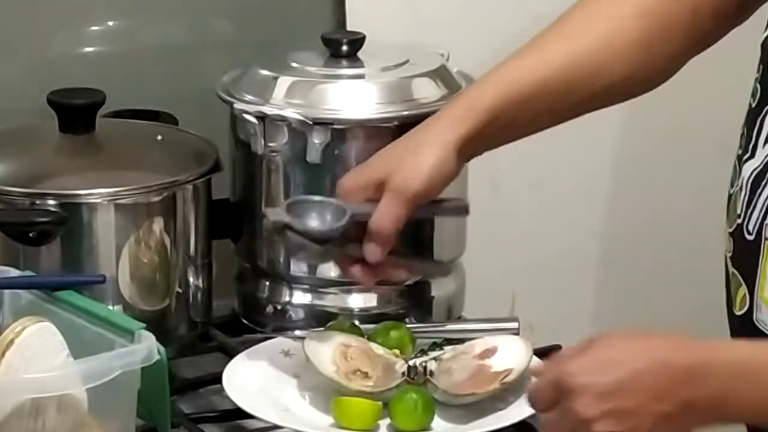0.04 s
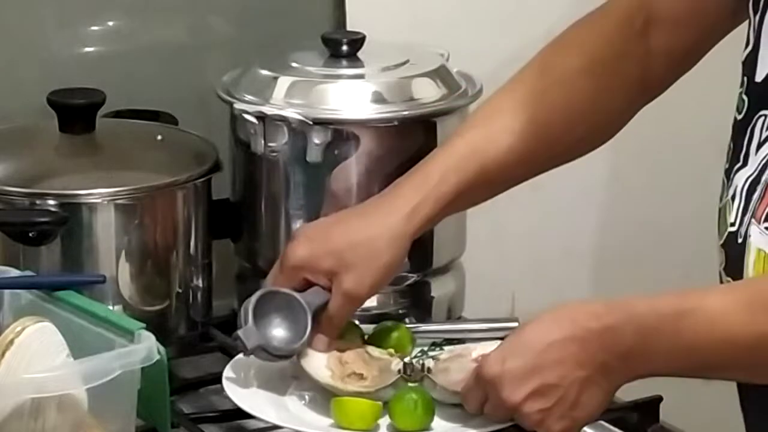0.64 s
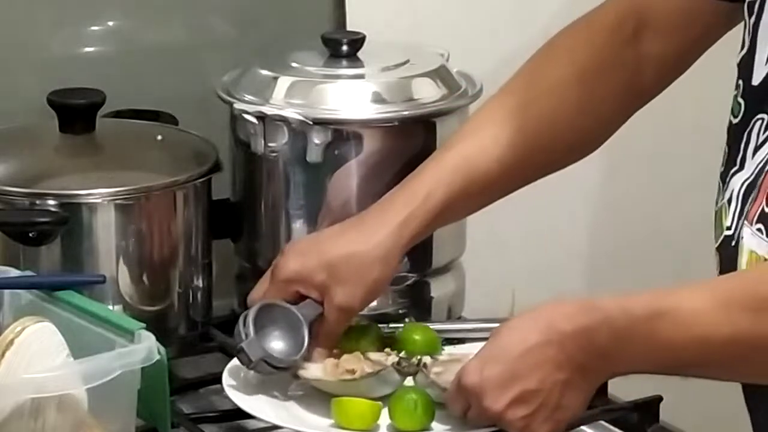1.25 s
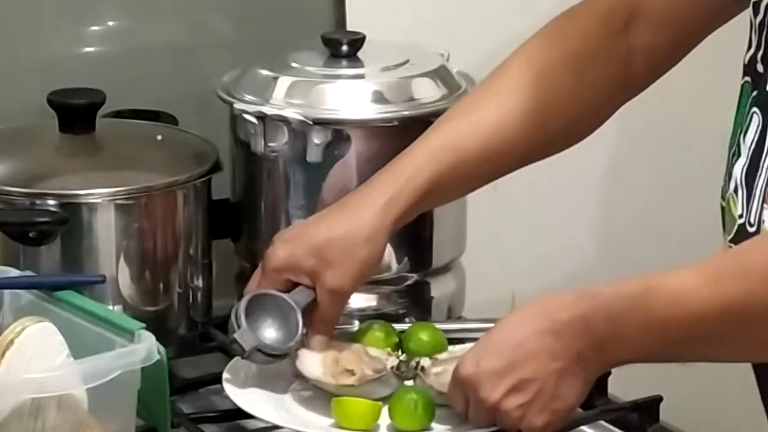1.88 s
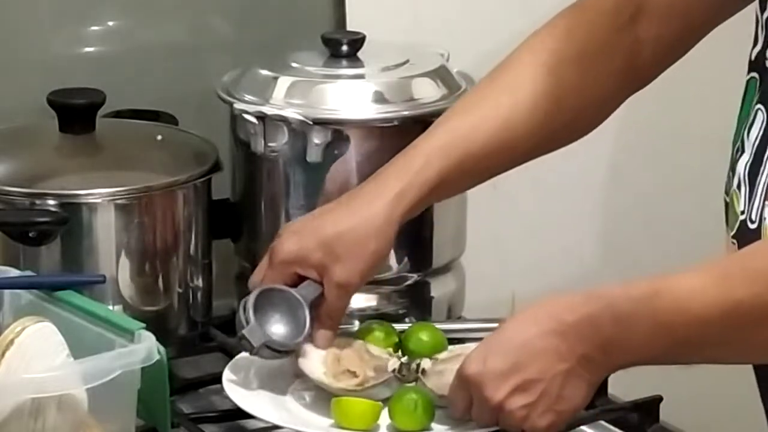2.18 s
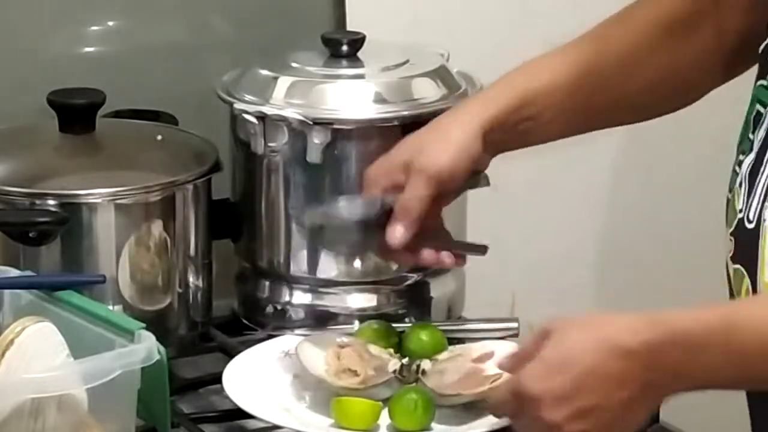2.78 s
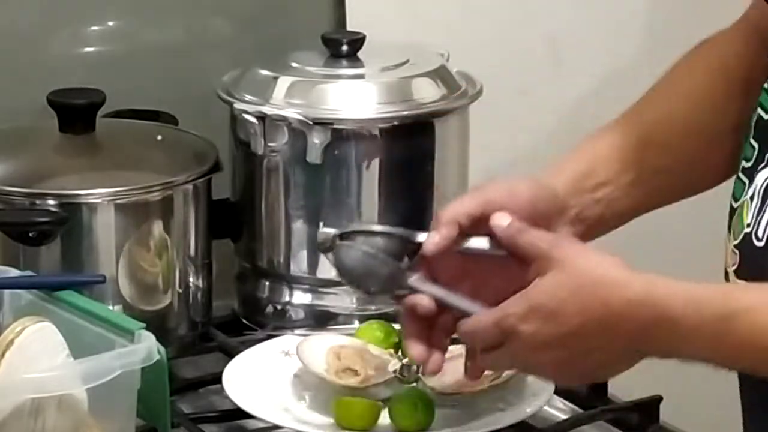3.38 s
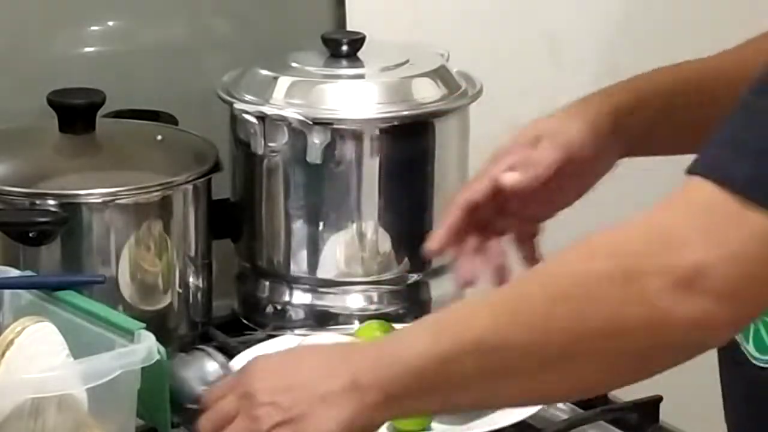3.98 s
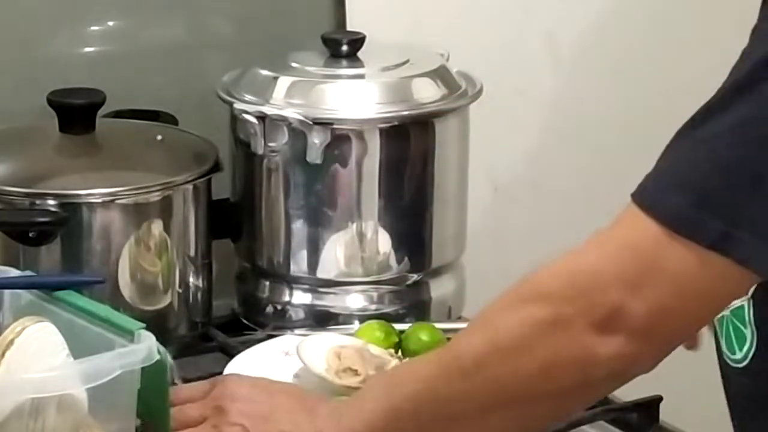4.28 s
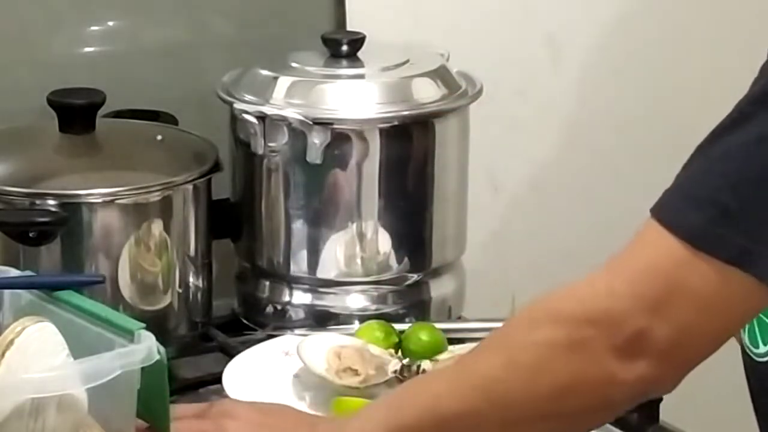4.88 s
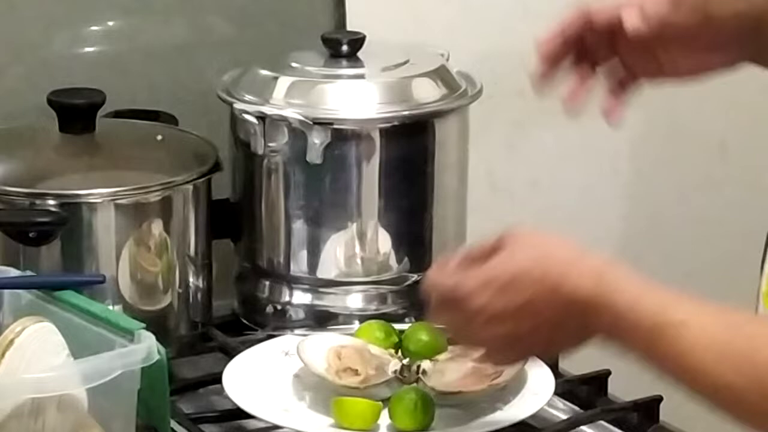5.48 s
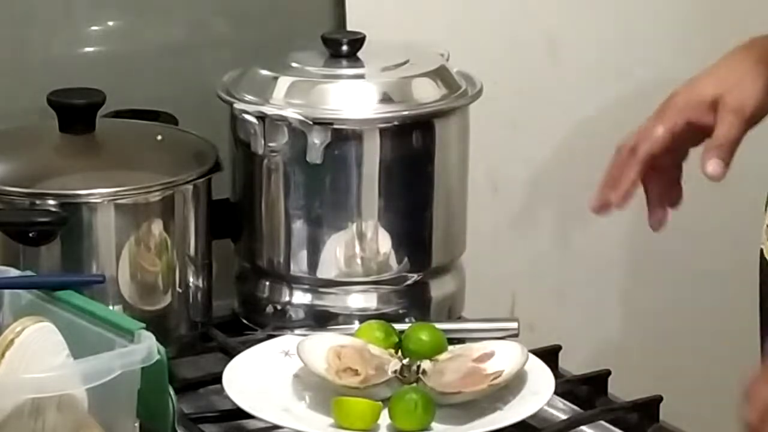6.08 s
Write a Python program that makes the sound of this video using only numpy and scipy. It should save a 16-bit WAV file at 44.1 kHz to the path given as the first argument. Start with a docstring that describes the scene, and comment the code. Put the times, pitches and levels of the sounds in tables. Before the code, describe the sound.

A soft, steady rumble fills a small, hard-walled kitchen. For the first two seconds, shells and a plate give faint ticks and short hollow knocks, with a tiny scrape at about 0.8 seconds. The halves of a metal lime squeezer meet in damped clinks at 2.2 and 2.4 seconds, then more faintly at 2.7 and 3.2. A dull, low thump bumps the worktop near 3.9 seconds. At 4.5 seconds comes the loudest sound: the squeezer clanks down with a sharp crack, ringing metal and a wood-like boom. It rocks against a thin steel utensil, clanking twice more around 4.8 seconds with a slight dragging rasp. A sleeve swishes softly several times from about 5.2 seconds on. Just before 6 seconds the steel utensil clanks once more, bright and ringing, with a short boom from the worktop.

```python
"""A metal lime squeezer clanks down on the worktop of a small, hard-walled kitchen and rocks against a
thin steel utensil, which later clanks once more: each hit is a crack, ringing metal and a wood-like boom.
Before that it is handled over a plate, with damped clinks, faint ticks, hollow knocks, a brief scrape
and a dull thump. A sleeve swishes as the arm draws back; the room rumbles softly underneath."""
import sys
import numpy as np
from scipy import signal
from scipy.fft import rfft, irfft, next_fast_len
from scipy.io import wavfile

SR = 44100
rng = np.random.default_rng(int(sys.argv[2]) if len(sys.argv) > 2 else 0)


def transcribe(signal):
    """Save signal, clipped to [-1, 1], as a 16-bit WAV file at the path in sys.argv[1]."""
    frames = np.atleast_2d(signal).T
    limited = np.clip(frames, -1, 1)
    pcm = np.round(limited * 32767).astype(np.int16)
    wavfile.write(sys.argv[1], SR, pcm)


N = 271060
TIME, HIT_TIME = np.arange(N) / SR, np.arange(2 ** 14) / SR

# metal lands and bounces: t/s, bounce gap/s, crack level/dB, crack tilt/(dB/octave), squeezer level/dB,
# steel level/dB, worktop level/dB, favoured boom f/Hz, ring roll-off f/Hz
CLANKS = [(4.545, 0.0046, -4, 3, -12, -14, -24, 144, 11000),
          (4.5478, 0.0062, 6, 4.5, 6, -22, -6, 168, 12540),
          (4.7646, 0.012, -1, 0, -10.5, -23, -20, 144, 11000),
          (4.819, .011, -9, -1.5, -23, -8.5, -21.5, 420, 9200),
          (5.9644, 0.0045, -2, 2, -18, -4, -13.5, 730, 15000),
          (5.9754, 0.012, -6, -1, -26, -8, -13.5, 276, 15000)]
# thuds of the rocking metal: t/s, level/dB, favoured boom f/Hz
ROCKS = [(4.556, -7.5, 231), (4.586, -5.5, 144), (4.796, -20, 720), (4.862, -19.5, 470), (5.968, -18, 800),
         (5.99, -22.5, 275)]
# the squeezer drags on the worktop: t/s, half length/s, level/dB
DRAGS = [(4.752, 0.029, -49), (4.86, 0.1, -65.5)]
# the squeezer's halves meet in the hand: t/s, level/dB
CLINKS = [(2.228, -26.5), (2.403, -25), (2.734, -36), (3.244, -38.5)]
# light taps on the shells and the plate: t/s, level/dB, favoured f/Hz
TAPS = [(0.051, -34, 8040), (0.629, -40, 1900), (0.786, -34, 1900), (1.01, -39.5, 4450),
        (1.089, -33.5, 8300), (1.157, -24.5, 8830), (1.477, -36.5, 4480), (1.787, -26, 4180),
        (1.976, -30, 2680), (3.918, -34, 2550)]
# knocks on the loaded plate: t/s, level/dB, f/Hz, ring level/dB
KNOCKS = [(0.632, -27.5, 614, -5), (1.158, -28.5, 900, -2), (1.745, -38, 710, -1), (1.789, -39, 510, -3),
          (1.803, -24.5, 404, 0.5), (2.232, -40, 710, 2.5), (2.408, -39.5, 624, 0)]
# a shell slides on the plate: t/s, half length/s, level/dB, favoured f/Hz
SCRAPES = [(0.804, 0.0098, -66, 1880), (0.829, 0.013, -67, 4460), (0.864, 0.022, -68, 2820)]
# soft bumps on the worktop: t/s, level/dB
THUMPS = [(3.9374, -10.5), (4.027, -21)]
# sleeve strokes: t/s, half length/s, level/dB
SWISHES = [(4.28, 0.089, -67), (5.17, 0.11, -66.5), (5.41, 0.025, -61.5), (5.62, 0.081, -57.5),
           (5.84, 0.027, -57), (6.12, 0.13, -54.5)]

# ringing modes of each body: f/Hz, level/dB, t60/s
SQUEEZER_MODES = [(837, -11, .22), (875, -15.5, .24), (912, -15, .22), (1462, -16, .31), (1597, -17, .27),
                  (1744, -12, .28), (1772, -12, .28), (2040, -16, .24), (2255, -20, .22),
                  (2412, -15.5, .25), (2697, -14, .3), (3214, -20, .26), (3643, -16.5, .33),
                  (3676, -14.5, .35), (3950, -12.5, .2), (4058, -14, .24), (4312, -17, .2),
                  (4425, -17, .17), (5111, -13, .22), (5211, -14, .33), (5242, -15.5, .28),
                  (5284, -15.5, .26), (5680, -20, .24), (6067, -20, .26), (6435, -14, .21), (6460, -17, .3),
                  (6560, -17, .22), (8710, -17, .22), (9450, -18, .22), (10930, -23, .18),
                  (11612, -17, .17), (13420, -21, .1)]
STEEL_MODES = [(1572, -12, .25), (2750, -13, .22), (2850, -10, .18), (2980, -15, .2), (3490, -15, .22),
               (3908, -14, .15), (6412, -10, .2), (8160, -14, .26), (8290, -16.5, .18), (9622, -6, .19),
               (9665, -10.5, .15), (9950, -18, .08), (11240, -16, .12), (12560, -20, .04),
               (13300, -24, .03), (14020, -19, .04), (14850, -23, .04)]
WORKTOP_MODES = [(144, -9, .45), (231, -3, .3), (275, -8, .15), (420, -9, .35), (470, -10, .1),
                 (508, -11, .3), (730, -9, .08), (850, -10, .07)]
HELD_MODES = [(1760, -5.5, .024), (1870, -8, .022), (2650, -12, .008), (3810, -8, .012), (4480, -18, .015),
              (5780, -6.5, .022), (9700, -11, .008), (13300, -20, .004)]   # the squeezer, damped by the hand
SHELL_MODES = [(1880, -8, .022), (2640, -9.5, .016), (2950, -12, .01), (4280, -12, .012), (4540, -8, .02),
               (6100, -11, .008), (8000, -11, .012), (9450, -13, .018), (10800, -13, .01),
               (12300, -16, .004)]   # a shell resting on the plate

# tone colours of the attacks, the sleeve and the room tone: f/Hz, level/dB
CRACK_EQ = [(25, -29), (60, -7), (170, -6), (600, -4), (850, 1.5), (1150, -6), (1800, -6.5), (3000, -7),
            (6500, -11), (7500, -13), (11500, -16.5), (12300, -33), (15800, -36.5)]
TICK_EQ = [(500, -14), (1300, -8), (2500, 0), (4500, 0), (7000, -2), (11000, -3), (12500, -11),
           (15500, -16)]
KNOCK_EQ = [(100, -14), (400, -0.5), (800, -13), (1300, -11), (3000, -16), (10000, -59)]
THUMP_EQ = [(25, -23), (65, 0), (105, 8), (190, -2), (260, -25.5), (370, -13), (500, -41), (2000, -56)]
CLOTH_EQ = [(150, 6), (500, 3), (1200, -3.5), (3500, -6.5), (7000, -9), (10000, -4.5), (13000, -16.5),
            (15800, -15.5)]
ROOM_TONE_EQ = [(15, -64), (25, -40), (47, -8), (66, -1), (133, -2.5), (157, -11), (216, -13), (307, -11),
                (333, -17.5), (691, -20), (929, -25), (1150, -27.5), (2520, -31.5), (11100, -31),
                (15800, -38.5)]

# the kitchen's reverb time: f/Hz, t60/s
KITCHEN_T60 = [(100, 0.84), (230, 0.68), (480, 0.28), (1840, 0.35), (4850, 0.31), (12800, 0.21)]
# stereo image of the room: f/Hz, left-right correlation
CORRELATION = [(60, 0.89), (290, 0.84), (640, 0.45), (1400, 0.1), (3000, 0.014)]

BOOM_BOOST_DB = 11.5   # lift of the worktop modes that the spot favours
PLATE_HZ = 720


def clanks(bounces=3, bounce_loss_db=5, rolloff_db_per_octave=32, build_s=0.0018):
    """Each bounce cracks and clangs, weaker and duller than the last; metal and worktop ring on."""
    out = np.zeros((2, N))
    shimmer = fine_modes(CRACK_EQ, t60=0.25, low_hz=1250, high_hz=7500, count=130)
    build_up = 1 - np.exp(-HIT_TIME / build_s)   # the free ring grows while the metal bounces
    for s, gap_s, crack_db, tilt_db, squeezer_db, steel_db, worktop_db, boom_hz, top_hz in CLANKS:
        # a softer contact leaves the highest modes still
        modes = [(hz, db + body_db - rolloff_db_per_octave * max(np.log2(hz / top_hz), 0), t60)
                 for body, body_db in ((SQUEEZER_MODES, squeezer_db), (STEEL_MODES, steel_db))
                 for hz, db, t60 in body]
        metal = ring(modes) + from_db(crack_db - 4.5) * ring(shimmer)
        boom = from_db(worktop_db) * ring(WORKTOP_MODES, boom_hz, BOOM_BOOST_DB)
        add(out, s, build_up * (metal + boom))
        for bounce in range(bounces):
            crack = from_db(crack_db) * click(CRACK_EQ, tilt_db - bounce)
            clang = from_db(-3) * ring(damped(modes, t60=0.022))   # choked while still touching
            hit = in_room(crack + clang, direct_db=-22)
            add(out, s + bounce * gap_s, from_db(-bounce * bounce_loss_db) * hit)
    return out


def rocking():
    """The metal's weight thuds down slowly: a dull crack and a worktop boom, with no metal ring."""
    out, crack = np.zeros((2, N)), click(CRACK_EQ, tilt_db=-6)
    for s, db, boom_hz in ROCKS:
        add(out, s, from_db(db) * in_room(crack, direct_db=-22))
        add(out, s, from_db(db - 6.5) * ring(WORKTOP_MODES, boom_hz, BOOM_BOOST_DB))
    return out


def dragging():
    """The squeezer sticks and slips with a dull rasp; the worktop groans, damped by its weight."""
    friction = slips(N, per_s=500) * swells(DRAGS)
    groan = from_db(0.5) * ring(damped(WORKTOP_MODES, t60=0.065), favoured_hz=420, boost_db=14.5)
    rasp = from_db(6) * click(CRACK_EQ, tilt_db=-4)
    drag = signal.fftconvolve([friction], groan + rasp, axes=1)
    return in_room(drag, direct_db=-8)[:, :N]


def clinks():
    """The squeezer's halves tick together and the hand chokes their ring."""
    out, tick = np.zeros((2, N)), from_db(-6.5) * click(TICK_EQ)
    for s, db in CLINKS:
        add(out, s, from_db(db) * in_room(tick + ring(HELD_MODES), direct_db=-19))
    return out


def taps(t60=0.017):
    """Light ticks ring differently at every spot and pass a little knock on to the plate."""
    out, tick = np.zeros((2, N)), from_db(-6) * click(TICK_EQ)
    for s, db, favoured_hz in TAPS:
        modes = fine_modes(TICK_EQ, t60, low_hz=1200, high_hz=14000, count=14)
        ping = from_db(-5.5) * ring(modes + [(favoured_hz, -1.5, t60)])
        plate = from_db(-6) * plate_knock(PLATE_HZ)
        add(out, s, from_db(db) * in_room(tick + ping + plate, direct_db=-19))
    return out


def knocks():
    """The loaded plate is bumped and sounds hollow, its pitch varying from knock to knock."""
    out = np.zeros((2, N))
    for s, db, hz, ring_db in KNOCKS:
        add(out, s, from_db(db) * in_room(plate_knock(hz, ring_db), direct_db=-14))
    return out


def plate_knock(hz, ring_db=-1, t60=0.02):
    """One knock on the plate: a dull attack and a single short mode."""
    return from_db(-2.5) * click(KNOCK_EQ) + ring([(hz, ring_db, t60)])


def scrape():
    """Tiny slips excite a shell and the plate under it; the favoured mode shifts with the contact."""
    out = np.zeros((2, N))
    for s, half_s, db, favoured_hz in SCRAPES:
        lead_s = 4 * half_s
        friction = slips(len(HIT_TIME), per_s=300) * swells([(lead_s, half_s, db)], HIT_TIME)
        plate = from_db(2) * plate_knock(PLATE_HZ, ring_db=-0.5)
        shell = from_db(6) * ring(SHELL_MODES, favoured_hz, boost_db=6.5)
        stroke = signal.fftconvolve([friction], click(TICK_EQ) + plate + shell, axes=1)
        add(out, s - lead_s, in_room(stroke, direct_db=-5))
    return out


def thumps(rebound_s=0.0215, rebound_loss_db=2.5):
    """Soft bumps move only the worktop's low end; each rebounds twice."""
    out, push = np.zeros(N), click(THUMP_EQ)
    for s, db in THUMPS:
        for rebound in range(3):
            add(out, s + rebound * rebound_s, from_db(db - rebound * rebound_loss_db) * push)
    return from_db(-11) * in_room(out, direct_db=11)[:, :N]   # carried mostly through the furniture


def sleeve():
    """Cloth noise swells and fades with each stroke of the arm."""
    return swells(SWISHES) * noise(CLOTH_EQ)


def room_tone():
    """A soft, steady bed of rumble."""
    return from_db(-62) * noise(ROOM_TONE_EQ)


def click(eq, tilt_db=0):
    """A minimum-phase attack of unit energy, tilted by tilt_db per octave above about 400 Hz."""
    hz = np.fft.rfftfreq(len(HIT_TIME), 1 / SR)
    colour = from_db(at_hz(eq, hz) + tilt_db * np.log2(1 + hz / 400))
    cepstrum = irfft(np.log(colour))
    cepstrum[len(HIT_TIME) // 2:] = 0
    return unit_energy(irfft(np.exp(2 * rfft(cepstrum))))


def ring(modes, favoured_hz=1, boost_db=0):
    """Decaying stereo modes, weighted anew on each hit and boosted near the favoured pitch."""
    out = 0
    for hz, db, t60 in modes:
        nearness = np.exp(-(10 * np.log(hz / favoured_hz)) ** 2)
        strength = from_db(db + boost_db * nearness + rng.standard_normal()) * rng.choice([-1, 1])
        # high modes reach the ears out of step
        phase = np.arccos(at_hz(CORRELATION, hz)) * rng.choice([-.5, .5])
        wave = np.sin(2 * np.pi * hz * HIT_TIME + [[phase], [-phase]])
        out = out + strength * np.sqrt(2) * wave * unit_energy(decay(t60))
    return out


def damped(modes, t60):
    """The same modes while the body is pressed against another."""
    return [(hz, db, t60) for hz, db, _ in modes]


def fine_modes(eq, t60, low_hz, high_hz, count):
    """Weak partials of random pitch and strength, with unit energy in all."""
    hz = low_hz + (high_hz - low_hz) * (np.arange(count) + rng.random(count)) / count
    strength = unit_energy(from_db(at_hz(eq, hz) + 2 * rng.standard_normal(count)))
    return [(f, 20 * np.log10(a), t60) for f, a in zip(hz, strength)]


def slips(size, per_s):
    """Stick-slip grain: sparse impulses of random strength."""
    slipping = rng.random(size) < per_s / SR
    return slipping * rng.standard_normal(size) * np.sqrt(SR / per_s)


def swells(strokes, t=TIME):
    """A bell-shaped fade in and out for each stroke."""
    return sum(from_db(db) * np.exp(-.5 * ((t - s) / half_s) ** 2) for s, half_s, db in strokes)


def noise(eq, size=N):
    """Diffuse noise of rms 1: narrow in the bass, wide in the treble."""
    padded = next_fast_len(size, True)
    hz = np.fft.rfftfreq(padded, 1 / SR)
    mid, side = rfft(rng.standard_normal((2, padded))) * from_db(at_hz(eq, hz))
    alike = at_hz(CORRELATION, hz)
    spectrum = np.sqrt(1 + alike) * mid + np.sqrt(1 - alike) * side * [[1], [-1]]
    stereo = irfft(spectrum, padded)[:, :size]
    return stereo / stereo.std()


def in_room(sound, direct_db):
    """The direct path plus dense reflections, new for every spot and dying sooner in the treble."""
    white = rfft(noise([(1, 0), (SR, 0)], size=len(HIT_TIME)))
    hz = np.fft.rfftfreq(len(HIT_TIME), 1 / SR)
    edges, room = np.geomspace(20, SR / 2, 14), 0
    for low, high in zip(edges, edges[1:]):
        band = irfft(white * ((hz >= low) & (hz < high)))
        tail = band * decay(at_hz(KITCHEN_T60, np.sqrt(low * high)))
        room = room + unit_energy(tail) * np.sqrt(2 * (high - low) / (SR / 2))
    room[:, 0] += from_db(direct_db)
    return signal.fftconvolve(np.atleast_2d(sound), room, axes=1)


def decay(t60):
    return np.exp(-np.log(1000) * HIT_TIME / t60)


def from_db(db):
    return 10 ** (np.asarray(db) / 20)


def at_hz(points, hz):
    """Reads a curve on a log-frequency axis."""
    x, y = np.transpose(points)
    return np.interp(np.log(np.maximum(hz, 1)), np.log(x), y)


def unit_energy(x):
    return x / np.sqrt(np.sum(x ** 2) + 1e-20)


def add(track, s, sound):
    """Mixes a sound in at time s."""
    start = int(s * SR)
    track[..., start:start + sound.shape[-1]] += sound[..., :N - start]


def scene():
    """The mix: metal on the worktop, small handling sounds, then sleeve and room tone."""
    landing = clanks() + rocking() + dragging()
    handling = clinks() + taps() + knocks() + scrape() + thumps()
    return landing + handling + sleeve() + room_tone()


def record(dry, low_cut_hz=42, high_cut_hz=15900):
    """Rolls off the deepest bass and cuts the top steeply."""
    low_cut = signal.butter(3, low_cut_hz, "high", fs=SR, output="sos")
    high_cut = signal.ellip(12, .1, 90, high_cut_hz, fs=SR, output="sos")
    return signal.sosfilt(high_cut, signal.sosfilt(low_cut, dry))


dry = scene()
out = record(dry)
transcribe(out)
```